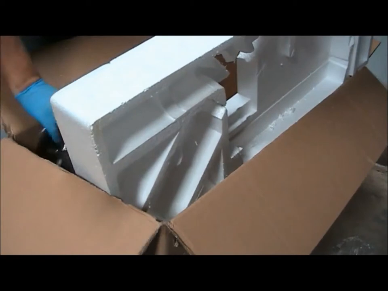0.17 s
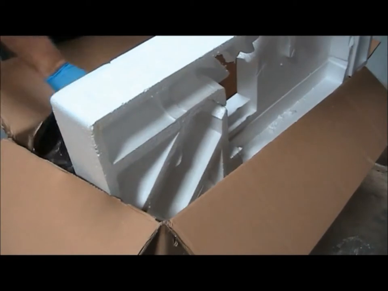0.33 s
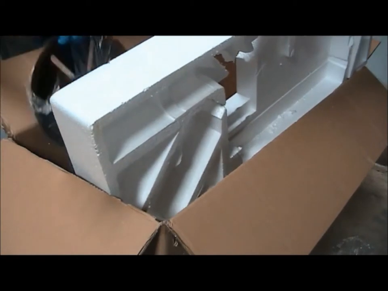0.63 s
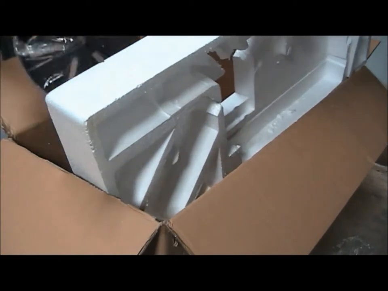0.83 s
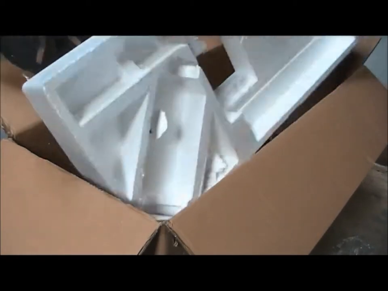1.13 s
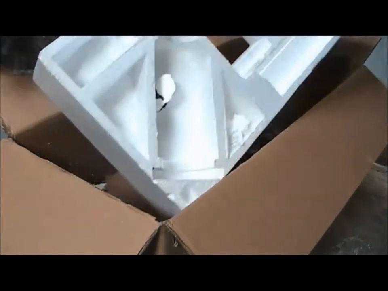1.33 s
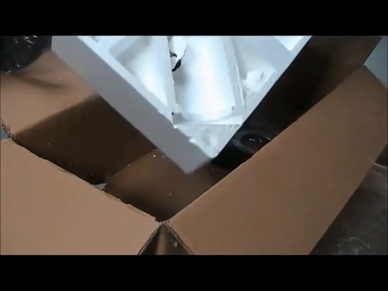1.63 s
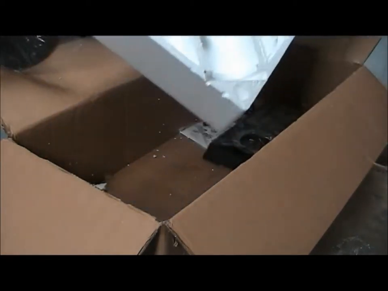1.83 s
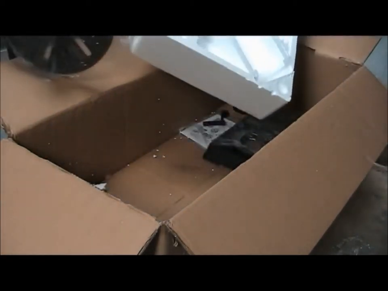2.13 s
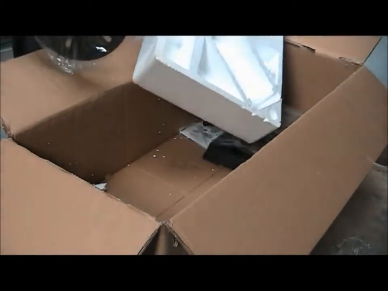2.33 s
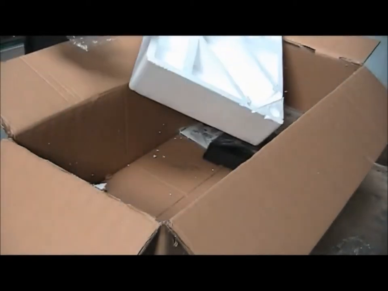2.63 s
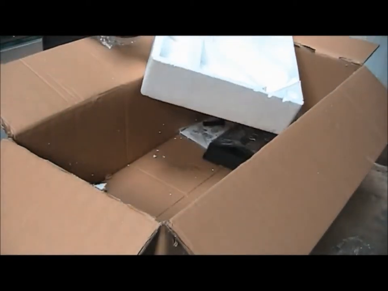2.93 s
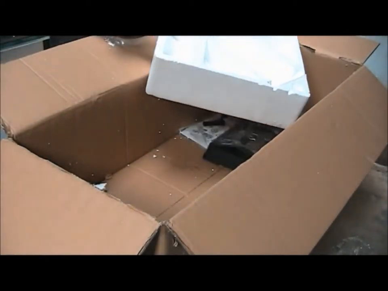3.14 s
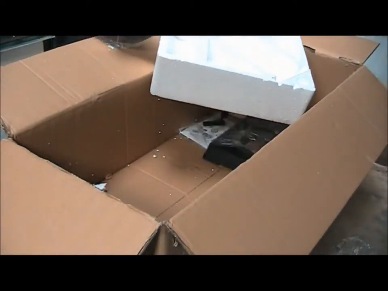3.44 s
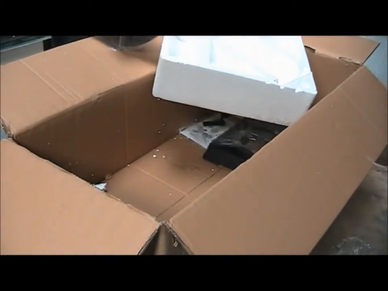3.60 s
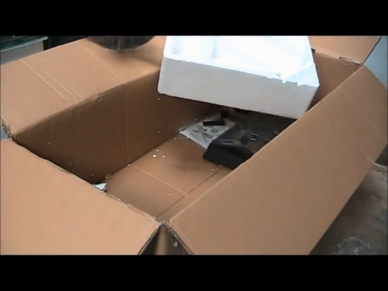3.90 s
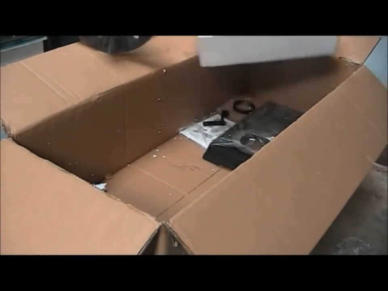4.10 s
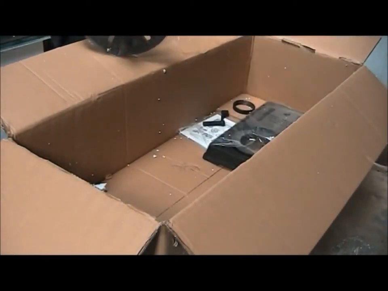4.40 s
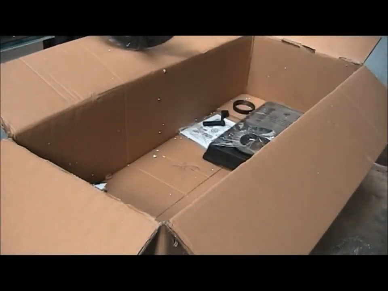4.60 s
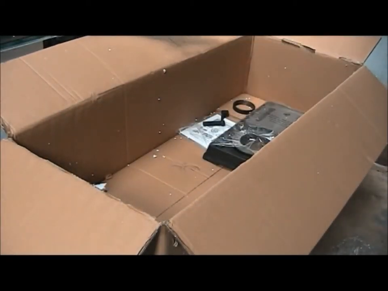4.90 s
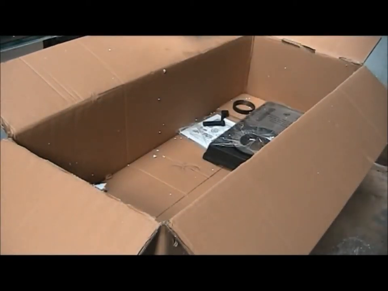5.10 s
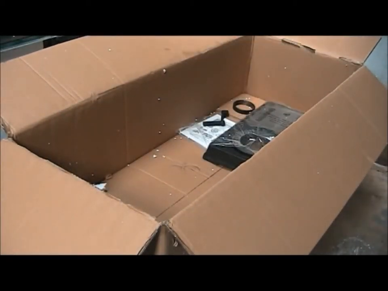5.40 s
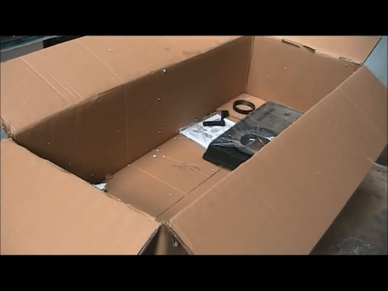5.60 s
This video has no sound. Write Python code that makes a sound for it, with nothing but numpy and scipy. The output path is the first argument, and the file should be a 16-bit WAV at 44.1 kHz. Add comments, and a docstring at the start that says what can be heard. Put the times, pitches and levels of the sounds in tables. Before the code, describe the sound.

In a bare, moderately echoing workshop, a close stereo microphone picks up a loud boomy bump and slap on a big carton, hollow foam knocks and light scraping. Around the middle, polystyrene rasps strongly along the cardboard, then fades to faint rubbing. A short squeaky rustle and dull thud follow, then one sharp slap rings in the room.

```python
"""Foam insert dragged out of a carton.

A polystyrene insert rasps along the walls of a big cardboard carton in a bare workshop: filtered tiny slips.
It bumps the carton, which booms like a drum: a flexing panel, a noise thud and decaying modes.
The hollow slab rings when knocked; bead and wrap snaps and hard slaps are filtered noise bursts.
Things are put down beside the box: a short squeaky rustle (wavering harmonics), a dull thud, a sharp slap.
"""
import sys
import numpy as np
from scipy import signal
from scipy.fft import rfft, irfft, next_fast_len
from scipy.io import wavfile

SR = 44100
rng = np.random.default_rng(int(sys.argv[2]) if len(sys.argv) > 2 else 0)


def transcribe(u):
    """Save the signal u as a 16-bit wav file named by the first command-line argument.

    u: samples, shape (n,) or (channels, n), limited to [-1, 1]; the rate is SR.
    q: integer samples, one column per channel.
    """
    v = np.clip(np.atleast_2d(u).T, -1, 1)
    q = np.round(v * 32767).astype(np.int16)
    wavfile.write(sys.argv[1], SR, q)


N = 253575
TIME = np.arange(N) / SR
TAIL = TIME[:SR]


def from_db(db):
    """Decibels to amplitude gain."""
    return np.exp(np.asarray(db) * np.log(10) / 20)


def rms_one(x):
    """Scale to rms 1."""
    return x / np.sqrt(np.mean(x ** 2) + 1e-20)


def at_hz(points, hz):
    """Interpolate a table on a log-frequency axis."""
    f, value = np.transpose(points)
    return np.interp(np.log(np.maximum(hz, 1)), np.log(f), value)


def cut(x, hz, kind, order=2):
    """Butterworth filter."""
    sos = signal.butter(order, np.clip(hz, 10, .45 * SR), kind, fs=SR, output="sos")
    return signal.sosfilt(sos, x + 1e-18)


def coloured(x, spectrum, size=4096):
    """Minimum-phase filter with the given spectrum, by folding the cepstrum."""
    level_db = at_hz(spectrum, np.fft.rfftfreq(size, 1 / SR))
    cepstrum = irfft(np.log(from_db(level_db)))
    cepstrum[1:size // 2] *= 2
    cepstrum[size // 2 + 1:] = 0
    impulse = irfft(np.exp(rfft(cepstrum)))
    return signal.fftconvolve(x, impulse[None])[:, :x.shape[1]]


def drift(per_s):
    """Random knots joined by lines, spread 1."""
    knots = rng.standard_normal(N // 20)
    return np.interp(TIME * per_s, np.arange(len(knots)), knots) * np.sqrt(3 / 2)


def add(out, s, sound):
    """Mix a stereo sound in at time s."""
    i = max(round(s * SR), 0)
    out[:, i:i + sound.shape[1]] += sound[:, :N - i]


def diffuse(size, width):
    """White stereo noise with the given width."""
    mid, side = rng.standard_normal((2, 1, size))
    return mid + coloured(side, width) * [[1], [-1]]


# workshop reverberation [f/Hz, t60/s]
ROOM_T60 = [(80, 0.84), (210, 0.56), (560, 0.56), (1500, 0.59), (3900, 0.55), (10000, 0.44), (16000, 0.39)]
# stereo width of blows [f/Hz, side re mid level/dB]
BLOW_WIDTH = [(30, 12.5), (120, -20), (250, -8.5), (600, -15), (1000, -12), (2000, -9), (4000, -4.5),
              (8000, -20.5), (14000, -7.5)]


def workshop(direct_db, build_s, contact_s=0.0015, width=BLOW_WIDTH):
    """Contact at a new spot: a short direct burst, then reflections that build up and die octave by octave."""
    white = diffuse(SR, width)
    noise = rfft(white)
    hz = np.fft.rfftfreq(SR, 1 / SR)
    centres = 125 * 2 ** np.arange(8)
    tail = 0
    for centre in centres:
        octave = irfft(noise * np.interp(hz, centres, centres == centre), SR)
        tail = tail + octave * from_db(-60 * TAIL / at_hz(ROOM_T60, centre))
    tail *= 1 - np.exp(-TAIL / build_s)
    # reversed noise, so that the burst differs from the tail
    direct = white[:, ::-1] * np.exp(-np.minimum(TAIL / contact_s, 20))
    return (rms_one(tail) + from_db(direct_db) * rms_one(direct)) / np.sqrt(SR)


def ringing(modes, uneven_db=0.5, detune=0.01):
    """One blow sets every mode ringing, with a strength and tuning that depend on the grip."""
    total = 0
    for hz, db, t60_s in modes:
        envelope = from_db(db + uneven_db * rng.normal() - 60 * TAIL / t60_s)
        total = total + envelope * np.sin(2 * np.pi * hz * rng.normal(1, detune) * TAIL)
    return total


# stereo width of rubbing [f/Hz, side re mid level/dB]
RUB_WIDTH = [(30, 0), (120, -2), (250, -6), (500, -10), (1000, -11), (2000, -9), (4000, -6.5), (8000, -7.5),
             (12000, -3.5)]


def slips(per_s, spread_db, clump_db, count=3):
    """Beads catch and let go at several spots: clumps of tiny uneven clicks, blurred by the room."""
    size_db = spread_db * np.minimum(rng.exponential(1, N), 3) + clump_db * np.tanh(drift(60))
    sizes = from_db(size_db) * rng.choice([-1, 1], N)
    clicks = sizes * (rng.random(N) < per_s / SR)
    spot = rng.integers(0, count, N)
    total = 0
    for k in range(count):
        path = workshop(direct_db=-3.0, build_s=0.0026, contact_s=0.00038, width=RUB_WIDTH)[:, :SR // 3]
        total = total + signal.oaconvolve((clicks * (spot == k))[None], path, axes=1)[:, :N]
    return rms_one(total)


def shifting(x, patchy_db=2.0, per_s=35):
    """The contact patch keeps changing, so each third of an octave swells and fades on its own."""
    size = next_fast_len(N)
    spectrum = rfft(x, size)
    hz = np.fft.rfftfreq(size, 1 / SR)
    centres = 700 * 2 ** (np.arange(13) / 3)
    total = 0
    for centre in centres:
        band = irfft(spectrum * np.interp(hz, centres, centres == centre), size)[:, :N]
        total = total + band * from_db(patchy_db * drift(per_s))
    return total


SCRAPE_ATTACK_S, RELEASE_DB_PER_S = 0.025, 173


def held(start_s, end_s):
    """Envelope of a rub: it takes hold, stays, and dies away once the foam lets go."""
    attack = np.clip((TIME - start_s) / SCRAPE_ATTACK_S, 0, 1)
    return attack * from_db(-RELEASE_DB_PER_S * np.clip(TIME - end_s, 0, 1))


# steady slide of the foam along the carton [t/s, rasp level/dB]
SLIDE = [(0.1, -40), (0.5, -43.5), (0.85, -40), (1.05, -46.5), (1.2, -56.5), (1.55, -49), (2.0, -44.5),
         (2.2, -47), (2.37, -59), (2.621, -29.5), (3.2, -33), (3.52, -41), (3.85, -37), (4.15, -50),
         (4.55, -46.5), (4.84, -45)]
# scrapes, where an edge catches and is pulled on
# [start t/s, length t/s, rasp level/dB, hiss re rasp level/dB, wall re rasp level/dB]
SCRAPES = [(-0.03, 0.049, -26, -6, 1.5), (.05, 0.033, -28.5, -1.5, -3.5), (0.181, 0.024, -31.5, -3, -1),
           (0.744, 0.14, -44, 3, -13), (0.883, 0.061, -35.5, 1, -10), (1.244, 0.22, -50, 1, -30),
           (1.632, 0.043, -43, -6, -15), (1.788, 0.021, -34.5, -5.5, -7.5), (1.87, 0.071, -42, -1.5, -1.5),
           (1.99, 0.063, -49.5, 5.5, -8), (2.055, 0.079, -43.5, 0, -11), (2.397, 0.022, -41, 3, -3.5),
           (2.43, .09, -34.5, -3.5, 4), (2.511, 0.15, -28.5, -4.5, -1.5), (2.652, 0.052, -24.5, -0.5, -20),
           (2.799, .05, -26.5, -5.5, -21), (2.864, 0.074, -24, -0.5, -16.5), (2.975, 0.13, -32, -1, -18),
           (3.086, 0.13, -28.5, -2.5, -13.5), (3.292, 0.13, -39.5, -8, 0), (3.61, .07, -30.5, -6.5, -12.5),
           (3.676, 0.088, -32, -3, -22), (3.864, 0.059, -42.5, 7, -22), (4.298, 0.056, -46.5, -13, -2.5),
           (4.409, 0.065, -45, -3.5, 2.5), (4.69, 0.17, -47.5, 4.5, -24), (5.564, 0.095, -44.5, -7.5, -1.5),
           (5.662, .08, -46, -8.5, -5)]
SLIDE_HISS_DB = -4.5   # re rasp
SLIDE_WALL_DB, WALL_FOLLOWS = -22.5, 0.68   # the wall takes up only a share of the rasp's swing in dB


def contact():
    """Gains of rasp, hiss and wall: the steady slide and the scrapes add in power."""
    s, level_db = np.transpose(SLIDE)
    slide_db = np.interp(TIME, s, level_db)
    gains_db = [slide_db, slide_db + SLIDE_HISS_DB, WALL_FOLLOWS * slide_db + SLIDE_WALL_DB]
    power = (held(-1, s[-1]) * from_db(gains_db)) ** 2
    for start_s, length_s, rasp_db, hiss_db, wall_db in SCRAPES:
        gains_db = [[rasp_db], [rasp_db + hiss_db], [rasp_db + wall_db]]
        power += (held(start_s, start_s + length_s) * from_db(gains_db)) ** 2
    return np.sqrt(power)


# colour of foam on cardboard [f/Hz, level/dB]
RASP = [(300, -24), (500, -2.5), (730, -2), (900, -1), (1150, 0), (1700, 2), (2400, 0), (3300, 0.5),
        (4600, -5), (5600, -8.5), (8300, -4.5), (9500, -11), (11000, -15), (13500, -7), (16000, -9.5)]
# colour of the rubbed carton wall [f/Hz, level/dB]
WALL = [(30, -27), (60, -14), (105, -7), (160, -17), (210, -3.5), (300, -6), (400, 2), (540, -3), (750, -3),
        (1300, -30.5)]


def rubbing(hiss_hz=5500, rasp_hz=560, fizz_hz=10500, fizz_db=0.0, fizz_growth=0.23):
    """Slips rasp, hiss and fizz in the foam; separate slips shake the carton wall."""
    foam = shifting(coloured(slips(per_s=2400, spread_db=2.0, clump_db=1.0), RASP))
    rasp = rms_one(cut(foam, [rasp_hz, hiss_hz], "band", order=3))
    hiss = from_db(0.5) * rms_one(cut(foam, [hiss_hz, fizz_hz], "band", order=3))
    fizz = rms_one(cut(foam, fizz_hz, "high", order=4))
    wall_slips = slips(per_s=900, spread_db=4.0, clump_db=8, count=2)
    wall = from_db(0.5) * rms_one(coloured(wall_slips, WALL))
    rasp_gain, hiss_gain, wall_gain = contact()
    # hard strokes are the brightest
    top = hiss + from_db(fizz_db) * rasp_gain ** fizz_growth * fizz
    return rasp_gain * rasp + hiss_gain * top + wall_gain * wall


# colour of the workshop's still air [f/Hz, level/dB]
AIR = [(15, -22), (25, -6), (64, -5.5), (236, -1), (373, -1.5), (545, -6.5), (840, -5), (3080, -10.5),
       (4870, -14.5), (7920, -12), (11000, -18.5), (14400, -19), (16000, -46)]
AIR_DB = -51.5   # rms


def still_air():
    """Steady coloured noise, its side 2.5 dB wider than that of the rubbing."""
    noise = diffuse(N, np.array(RUB_WIDTH) + [0, 2.5])
    return from_db(AIR_DB) * rms_one(coloured(noise, AIR))


# single snaps of foam beads and plastic wrap [t/s, level/dB, centre f/Hz]
SNAPS = [(.030, 5, 8000), (0.539, -4, 8000), (0.913, -9, 5140), (1.372, -3, 3170), (1.908, 2, 3430),
         (2.106, 1, 3940), (2.2882, -6.5, 3940), (3.98, 3, 7940), (4.078, -3, 3000), (5.084, -6.5, 2800)]


def snaps(snap_db=-9.5):
    """Small bright ticks close to the microphone: band-passed bursts, more direct than reverberant."""
    out = np.zeros((2, N))
    for s, level_db, centre_hz in SNAPS:
        tick = cut(workshop(direct_db=4.5, build_s=0.0012), [centre_hz / 1.53, centre_hz * 1.33], "band")
        add(out, s, from_db(snap_db + level_db) * tick)
    return out


# bumps against the carton
# [t/s, level/dB, lowest moved f/Hz, contact cut-off f/Hz, struck panel f/Hz, panel level/dB]
BUMPS = [(.2030, 1, 74, 815, 410, 6), (.250, -11, 52, 850, 104, 5), (0.319, -18.5, 45, 900, 61.6, 4),
         (0.6128, -11.5, 468, 1530, 943, 5), (0.62, -17, 45, 277, 212, -2), (2.429, -15, 75, 760, 537, -3),
         (2.544, -18.5, 62, 755, 112, 10.5), (2.626, -20.5, 52, 850, 705, 8),
         (2.889, -18.5, 80, 252, 105, -4), (3.334, -24.5, 129, 276, 184, 1), (3.66, -23, 172, 340, 244, -7),
         (4.17, -31.5, 139, 390, 254, -2), (4.436, -31, 182, 1210, 805, 5),
         (4.8621, -8.5, 141, 607, 420, 6)]
# first touch and two rebounds of every bump [delay t/s, level/dB]
REBOUNDS = [(0, 0), (.015, -6), (.041, -6)]
# colour of a blow on cardboard [f/Hz, level/dB]
THUD = [(30, -8), (60, -6), (105, -1.5), (170, 3), (230, -3.5), (300, 6), (410, 7), (540, 4), (750, 3.5),
        (1200, -0.5), (3000, -1.5), (16000, -6)]
# carton modes [f/Hz, level/dB, t60/s]
CARTON = [(62, -7, 1.3), (107.2, 1, 0.48), (156.5, -18, 1.14), (201, -10.5, 0.69), (290.8, -3, 0.59),
          (340, -4, 0.41), (372.4, 1.5, 0.41), (420, 0.5, 0.69), (463, -8, 0.64), (580, -9, 0.55),
          (726, -6.5, 0.57), (828, -2, 0.44), (967, -0.5, 0.32)]


def bumps(thud_db=26, ring_db=-21, panel_db=-5, panel_cycles=8):
    """The struck panel flexes for a few cycles, thuds into the room and rings the carton."""
    out = np.zeros((2, N))
    for s, level_db, low_hz, contact_hz, panel_hz, flex_db in BUMPS:
        cycles = panel_hz * TAIL
        flex = np.sin(2 * np.pi * cycles) * (1 - np.exp(-2 * cycles))
        flex *= from_db(-60 * np.minimum(cycles / panel_cycles, 2))
        for delay_s, rebound_db in REBOUNDS:
            thud = coloured(workshop(direct_db=-8.0, build_s=0.00065), THUD)
            blow = from_db(thud_db) * thud + from_db(ring_db) * ringing(CARTON)
            blow = cut(blow, contact_hz, "low", order=3)
            blow = cut(blow, low_hz, "high", order=4)
            bump = blow + from_db(panel_db + flex_db) * flex
            add(out, s + delay_s, from_db(level_db + rebound_db) * bump)
    return out


# hard slaps of foam and plastic [t/s, level/dB, cut-off f/Hz]
SLAPS = [(.208, -3.5, 12400), (.217, -4.5, 15300), (0.6147, -11.5, 3440), (.622, -14.5, 15000),
         (2.446, -14.5, 6000), (2.544, -15.5, 5000), (4.866, -18.5, 9500), (5.260, -28, 12360),
         (5.3096, 1.5, 13200)]
# colour of a slap [f/Hz, level/dB]
SLAP = [(47, -87), (80, -39), (95, -46), (279, -10.5), (332, -10.5), (396, -3), (526, -10), (627, -3),
        (1010, -3.5), (1210, 0.5), (1440, -0.5), (1640, -0.5), (2660, -3.5), (8120, -12.5), (15000, -23.5)]


def slaps(slap_db=25):
    """Flat, hard contacts: a crack that is mostly heard as the ring of the room."""
    out = np.zeros((2, N))
    for s, level_db, top_hz in SLAPS:
        crack = coloured(workshop(direct_db=-7.5, build_s=0.00072, contact_s=0.011), SLAP)
        add(out, s, from_db(slap_db + level_db) * cut(crack, top_hz, "low"))
    return out


# knocks on the hollow foam slab [t/s, level/dB]
KNOCKS = [(0.535, -30.5), (0.581, -25.5), (0.613, -25.5), (0.638, -18), (.742, -31), (1.72, -40.5),
          (2.002, -43)]
# slab modes [f/Hz, level/dB, t60/s]
SLAB = [(375, -3, 0.33), (395, -14.5, 0.6), (432, -5, 0.32), (446, -20, 0.79), (748, -15, 0.48),
        (850, -17.5, 0.46), (977, -14, 0.2)]


def knocks():
    """The slab answers a knock with one hollow note, a sum of decaying modes."""
    out = np.zeros((2, N))
    for s, level_db in KNOCKS:
        add(out, s, from_db(level_db) * cut(ringing(SLAB)[None], 940, "low"))
    return out


# squeaky slide [t/s, level/dB, slip rate f/Hz]
SQUEAK = [(4.68, -70, 980), (4.722, -48, 1000), (4.75, -53, 990), (4.782, -48, 1035), (4.81, -57, 1010),
          (4.835, -53, 995), (4.87, -74, 970)]


def squeak():
    """Stick and slip repeat about a thousand times a second, unevenly: a soft, hoarse stack of harmonics."""
    s, level_db, slip_hz = np.transpose(SQUEAK)
    rate_hz = np.interp(TIME, s, slip_hz) * (1 + .03 * drift(300))
    turns = np.cumsum(rate_hz) / SR
    harmonics_db = [-1, -1, -3, 1, -5, -10, -1, 3]
    tone = sum(from_db(db) * np.sin(2 * np.pi * k * turns) for k, db in enumerate(harmonics_db, 1))
    envelope_db = np.interp(TIME, s, level_db, left=-120, right=-120) + 3 * drift(200)
    tone = rms_one(tone) * from_db(envelope_db)
    return signal.fftconvolve(tone[None], workshop(direct_db=7, build_s=0.0017))[:, :N]


# stereo lean, strongest to the left in the deep bass [f/Hz, left re right level/dB]
LEAN = [(30, 12.5), (120, -1), (400, 1), (1000, 0.7), (2000, 1.3), (4000, 1), (14000, -0.5)]


def scene():
    """Sum the handling sounds and the still air, then lean the mix by opposite left and right filters."""
    left, right = rubbing() + still_air() + snaps() + bumps() + slaps() + knocks() + squeak()
    half_lean = np.array(LEAN) * [1, .5]
    return np.vstack([coloured(left[None], half_lean), coloured(right[None], half_lean * [1, -1])])


CUTOFF_HZ = 15600


def record(dry):
    """Round the highest peaks by soft saturation and cut the top with a steep elliptic low-pass."""
    rounded = dry / (1 + dry ** 6) ** (1 / 6)
    return signal.sosfilt(signal.ellip(12, .1, 90, CUTOFF_HZ, fs=SR, output="sos"), rounded)


dry = scene()
out = record(dry)
transcribe(out)
```